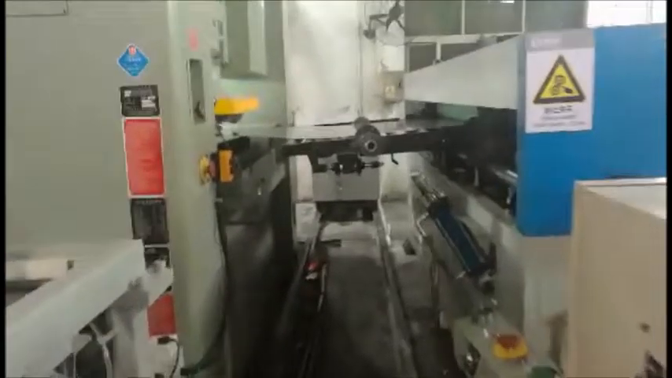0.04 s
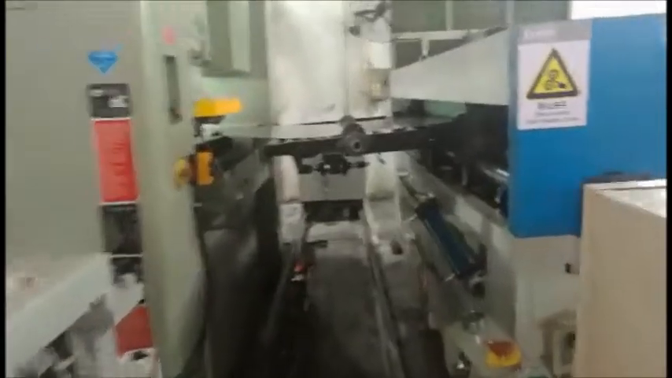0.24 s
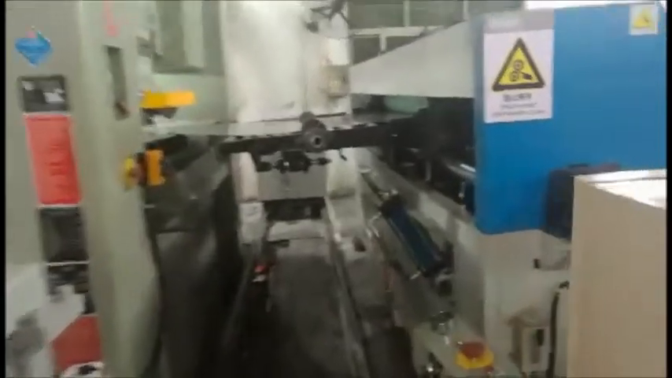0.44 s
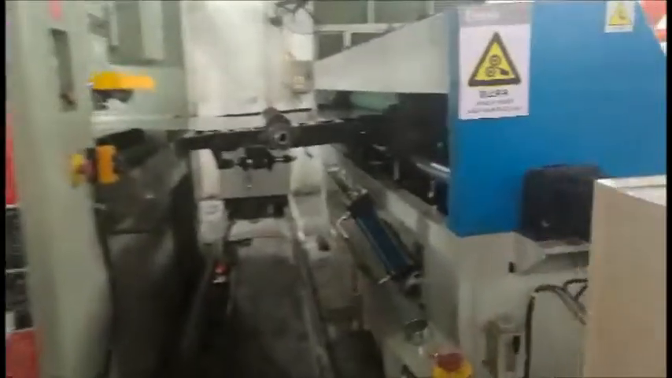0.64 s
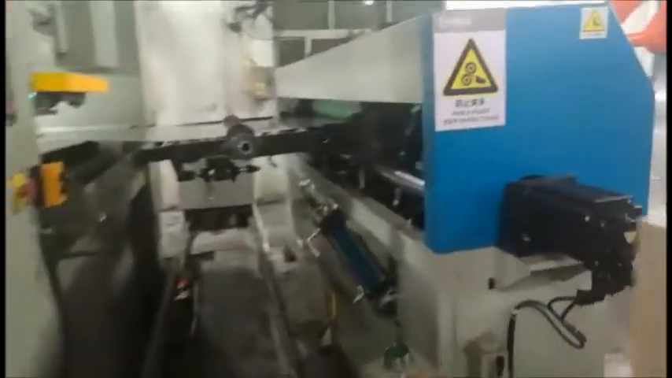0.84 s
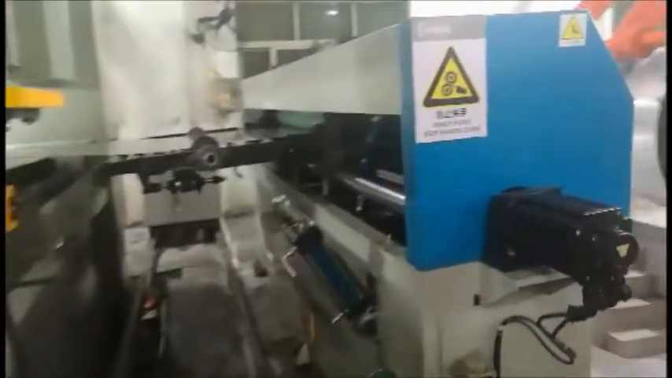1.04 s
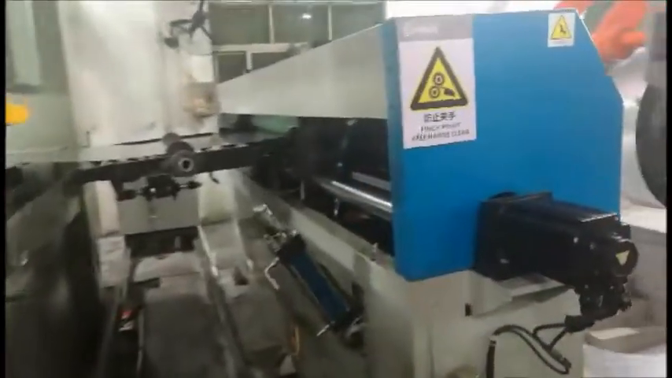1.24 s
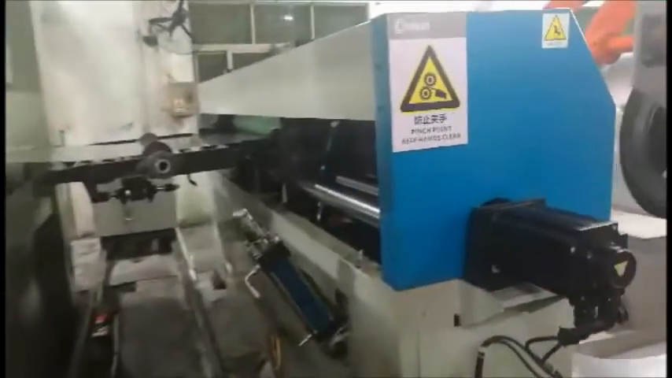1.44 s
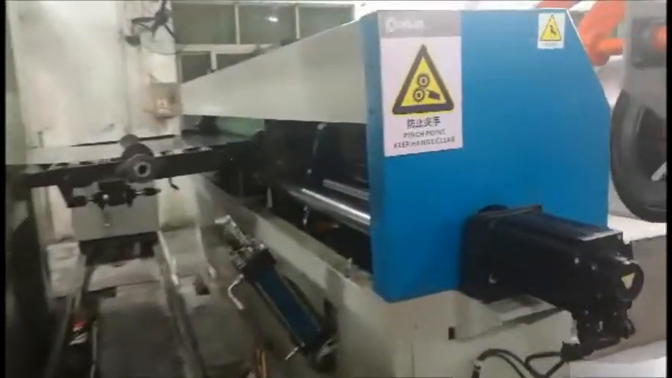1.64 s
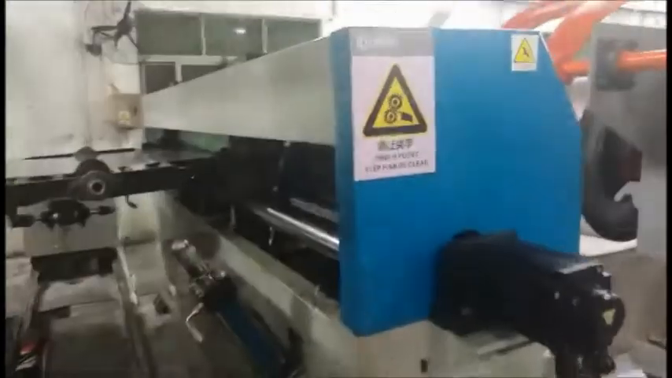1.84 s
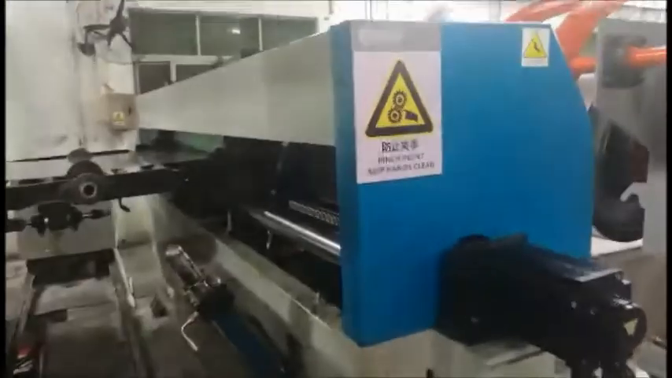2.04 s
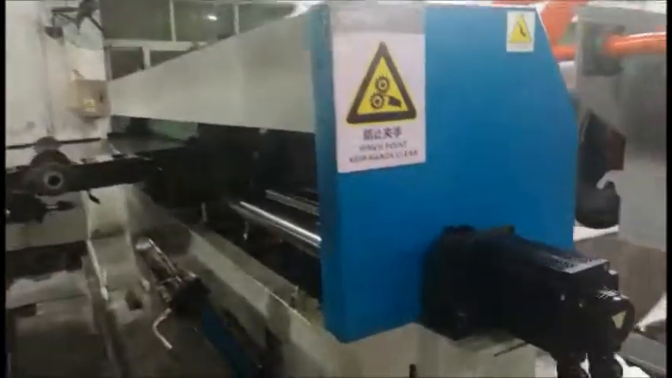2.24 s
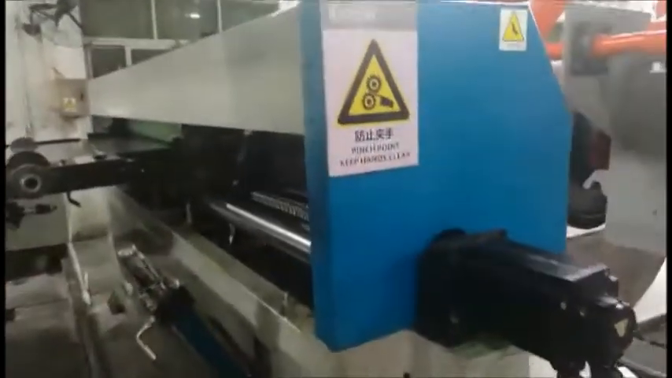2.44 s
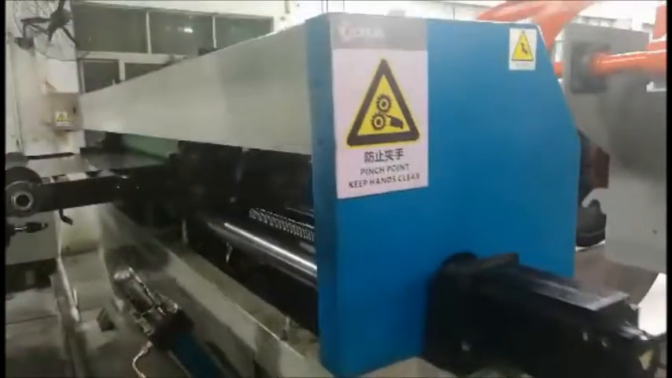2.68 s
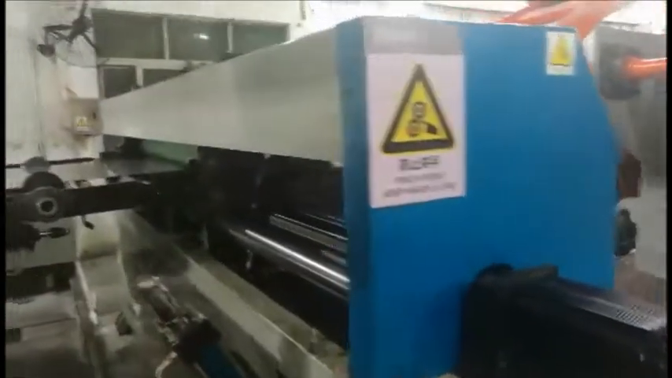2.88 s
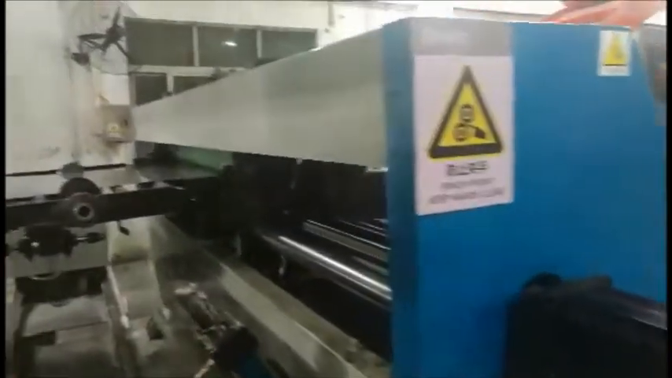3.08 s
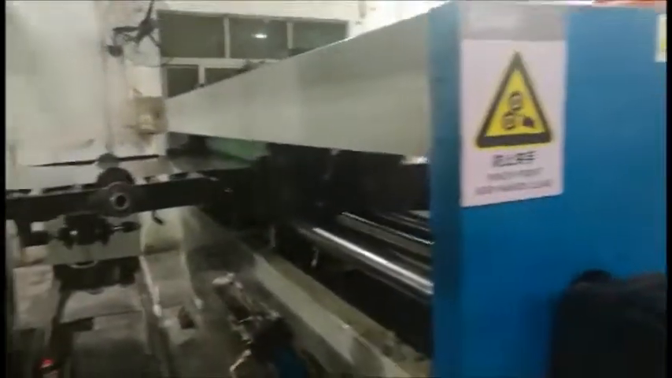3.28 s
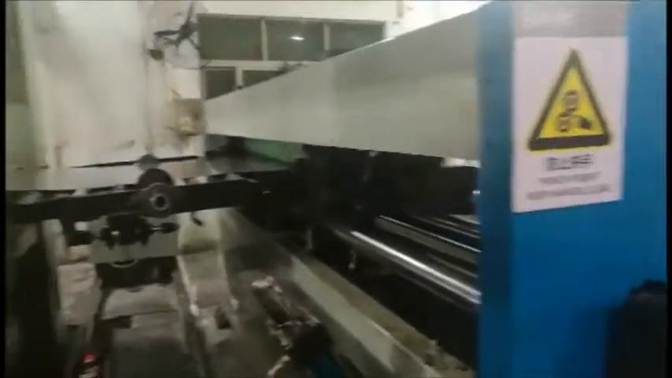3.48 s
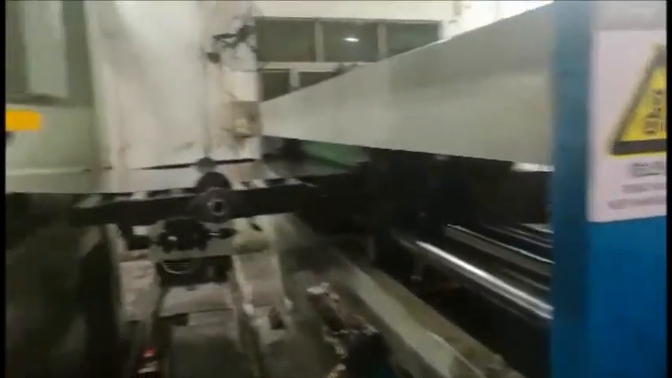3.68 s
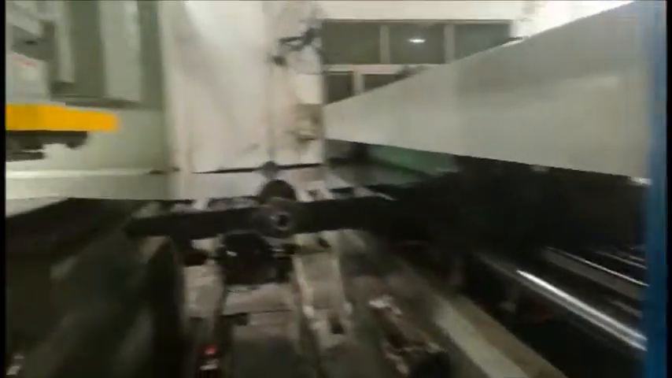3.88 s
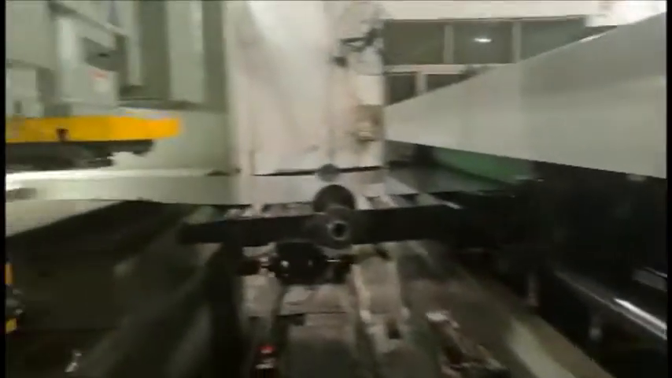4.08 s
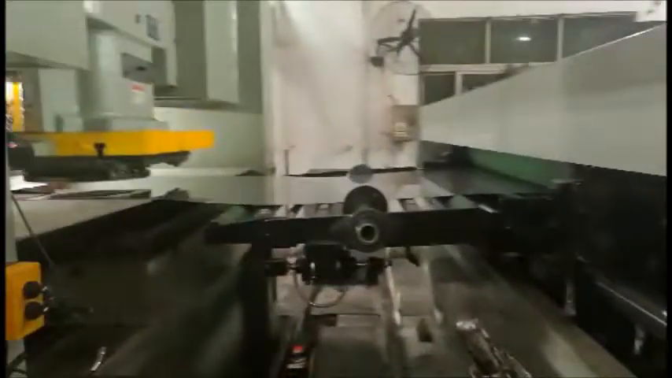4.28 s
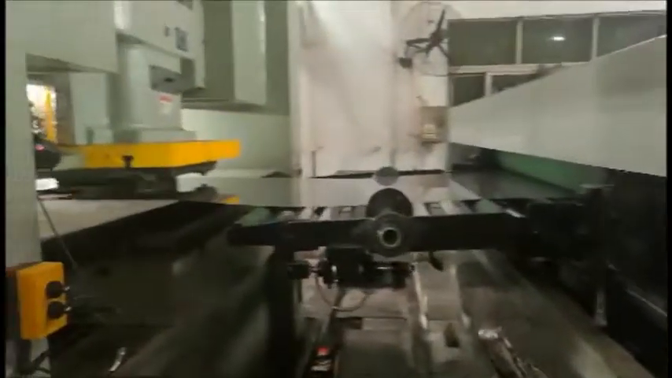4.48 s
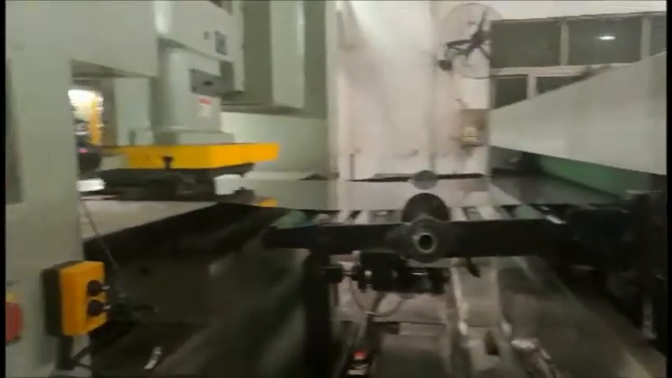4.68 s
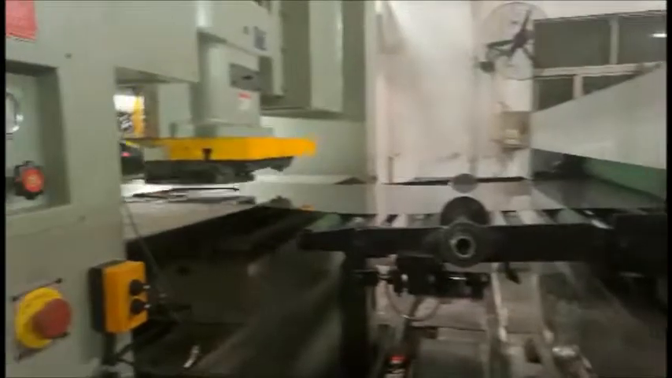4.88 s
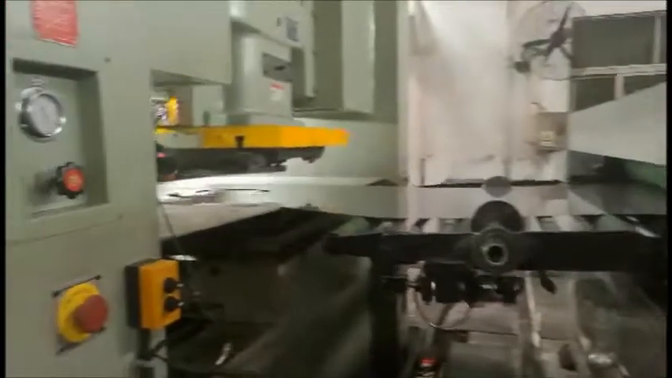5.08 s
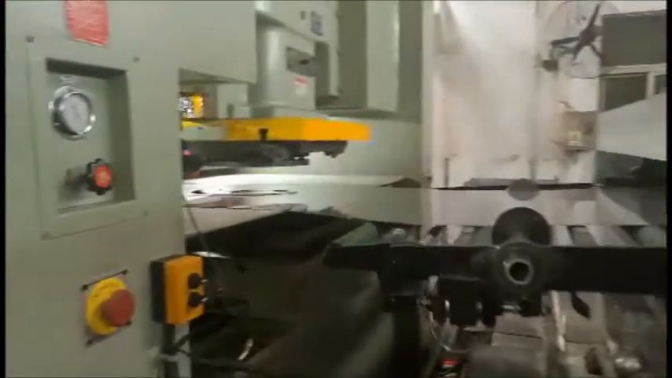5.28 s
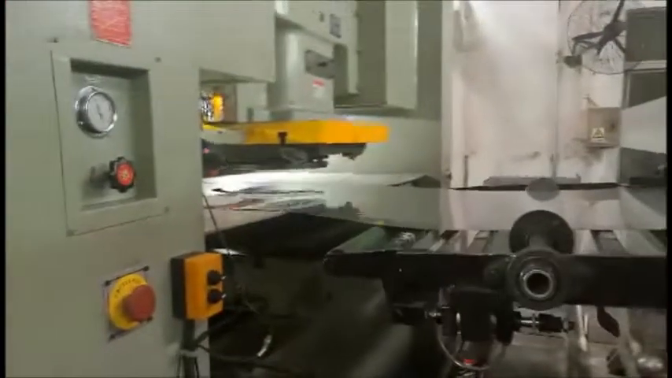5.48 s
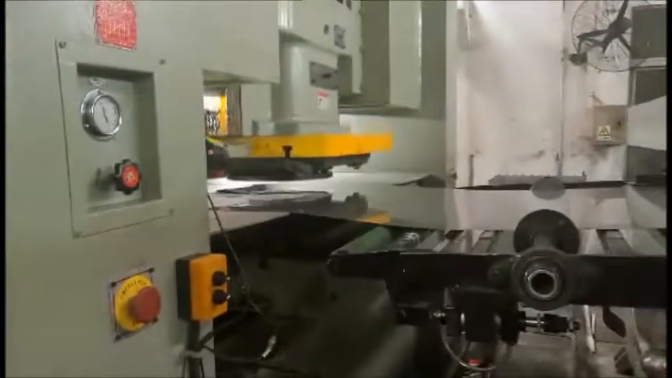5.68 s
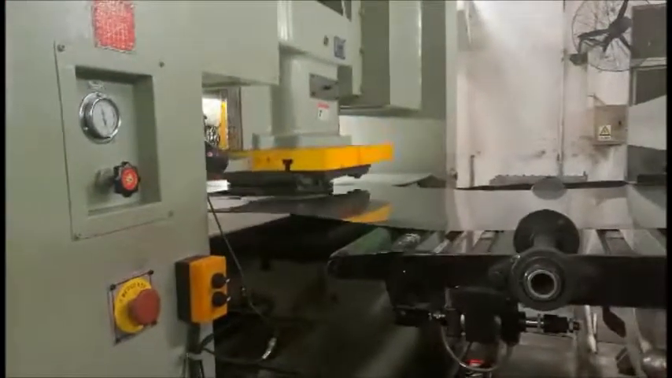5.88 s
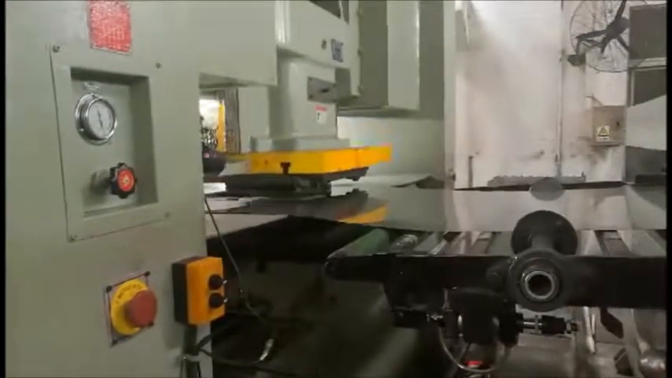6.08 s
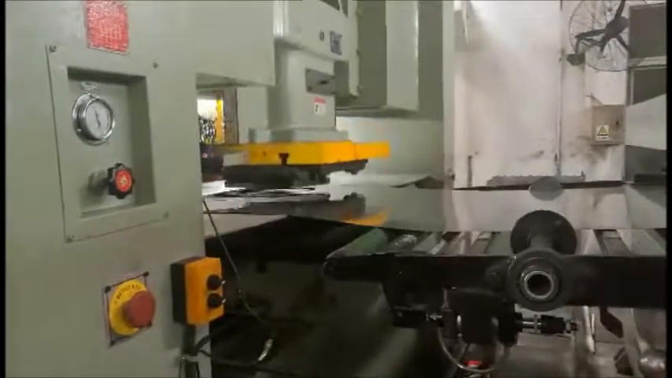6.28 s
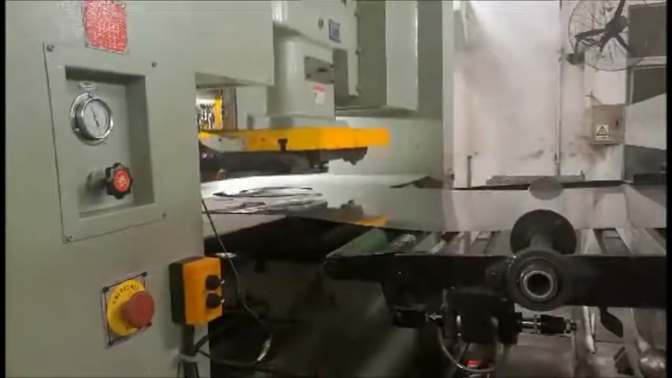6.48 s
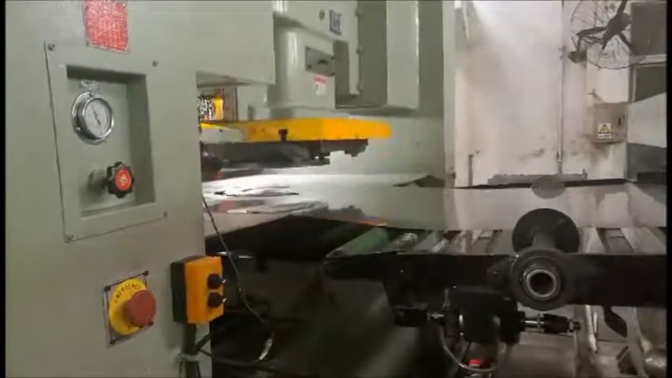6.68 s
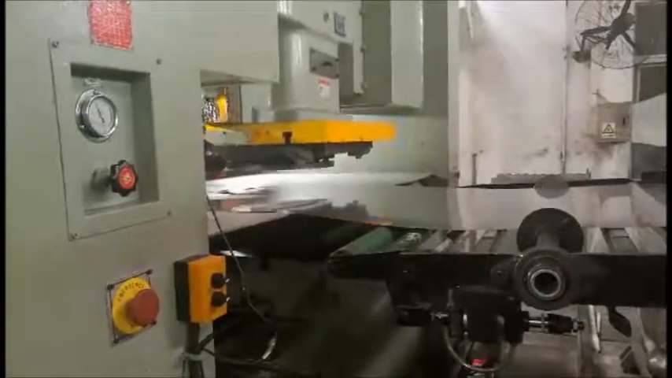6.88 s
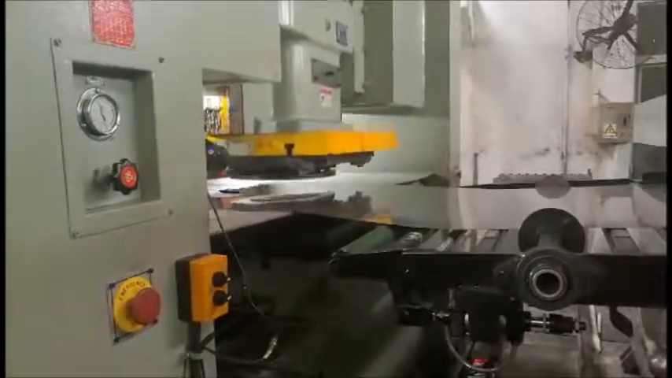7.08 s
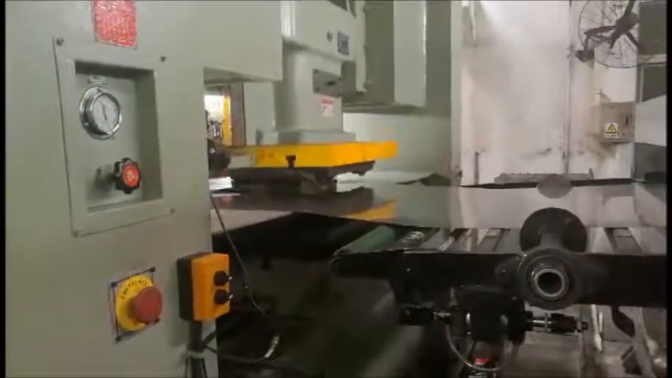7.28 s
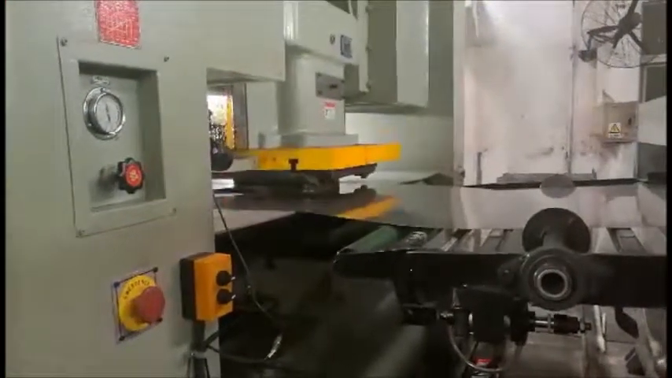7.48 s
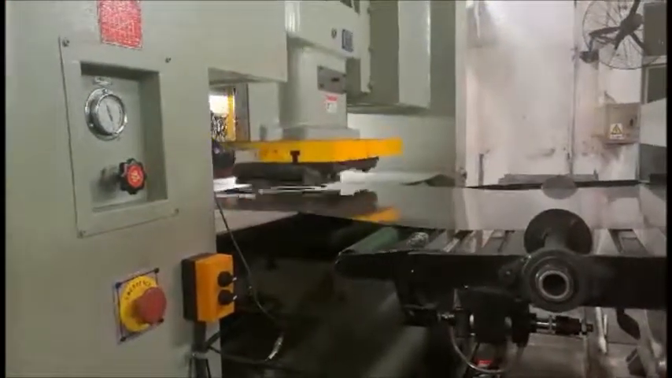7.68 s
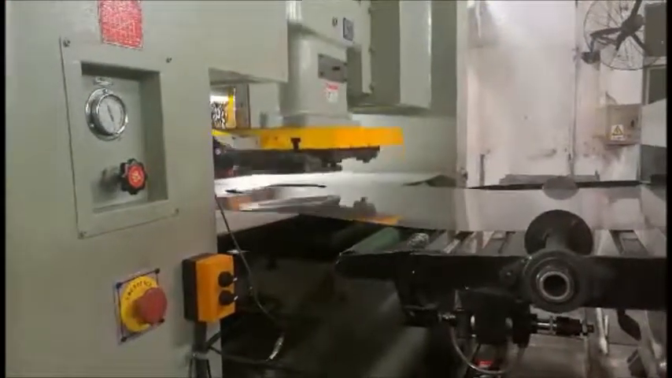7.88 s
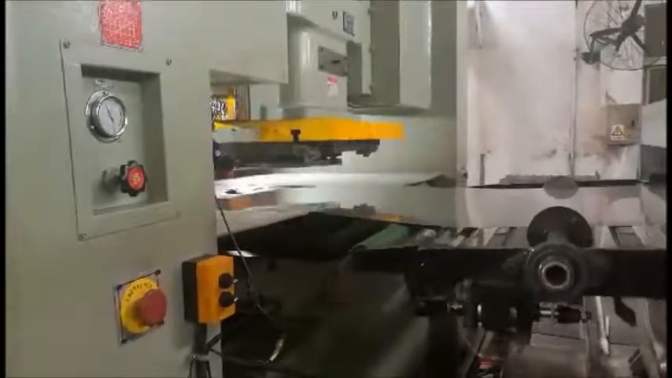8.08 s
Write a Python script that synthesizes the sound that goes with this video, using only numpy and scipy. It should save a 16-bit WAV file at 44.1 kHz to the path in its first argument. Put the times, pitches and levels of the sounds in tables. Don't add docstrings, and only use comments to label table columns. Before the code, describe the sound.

Six heavy metallic bangs ring through a humming factory, separated by sharp air spits, soft pneumatic sighs, dull distant thumps and tiny feeder ticks.

```python
import sys
import numpy as np
from scipy import signal
from scipy.fft import rfft, irfft, next_fast_len
from scipy.io import wavfile
from scipy.ndimage import uniform_filter1d

SR = 44100
rng = np.random.default_rng(int(sys.argv[2]) if len(sys.argv) > 2 else 0)


def dump(signal):
    limited = np.clip(np.atleast_2d(signal).T, -1, 1)
    pcm = np.round(limited * 32767).astype(np.int16)
    wavfile.write(sys.argv[1], SR, pcm)


def ratio_of_db(decibels):
    return 10 ** (np.asarray(decibels, float) / 20)


N = 358533


def evened(x):
    return x / np.sqrt(np.mean(x ** 2) + 1e-20)


def read(points, hz):
    f, value = np.transpose(points)
    return np.interp(np.log(hz + 1), np.log(f + 1), value)


def add(mix, s, sound, pan_db=0):
    part = mix[:, max(round(s * SR), 0):][:, :sound.shape[1]]
    sides = ratio_of_db(np.array([[pan_db / 2], [-pan_db / 2]]))
    part += sound[:, :part.shape[1]] * sides


def patches(hz, t, db):
    field = rng.standard_normal((len(hz), len(t)))
    across_pitch = uniform_filter1d(field, 7, 0)
    return ratio_of_db(db * evened(uniform_filter1d(across_pitch, 12, 1)))


def diffuse(seconds, gain, size):
    # pitch_hz, likeness (1 same, 0 unrelated, -1 opposite)
    likeness = [(60, 0.89), (130, 1), (290, 0.83), (640, -0.29), (1410, 0.19), (3100, -0.11), (6820, 0.06),
                (15000, -0.014)]
    hop = size // 4
    hz = np.fft.rfftfreq(size, 1 / SR)[:, None]
    t = np.arange(round(seconds * SR) // hop + 2) * hop / SR
    a, b, c, d = rng.standard_normal((len(t), len(hz), 4)).T
    same = np.clip(read(likeness, hz), -1, 1)
    left = a + 1j * b
    right = same * left + np.sqrt(1 - same ** 2) * (c + 1j * d)
    spectra = np.array([left, right]) * gain(hz, t)
    return signal.istft(spectra, nperseg=size, noverlap=size - hop)[1]


def hum():
    # pitch_hz, level_db (per Hz)
    background = [(12, -47), (20, -14), (148, -7.5), (196, -6.5), (289, 0.5), (477, -10.5), (685, -5.5),
                  (787, -4.5), (1010, -12), (1720, -11), (4940, -18), (7500, -25), (12000, -23),
                  (14200, -25), (15500, -78)]

    def spectra(hz, t):
        return ratio_of_db(read(background, hz)) * patches(hz, t, db=1.56)
    return ratio_of_db(-38.5) * evened(diffuse(N / SR + .1, spectra, size=1024)[:, :N])


def coloured(x, points, tilt_db=0, pivot_hz=1000, modes=()):
    hz = abs(np.fft.fftfreq(2 ** 14, 1 / SR))
    peaks = 1 + sum(ratio_of_db(db) ** 2 / (1 + (2 * (hz - f) / w) ** 2) for f, w, db in modes)
    level_db = read(points, hz) + tilt_db * np.log2((hz + 30) / pivot_hz)
    log_gain = np.log(ratio_of_db(level_db) * np.sqrt(peaks))
    body = np.fft.ifft(np.exp(np.conj(signal.hilbert(log_gain)))).real
    return signal.fftconvolve(x, body[None] / np.linalg.norm(body), axes=1)


def hall(force, near_db, far_db, seconds):
    # pitch_hz, t60_s (time to fade by 60 dB)
    near_fade = [(50, 0.17), (200, 0.75), (800, 0.39), (3000, 0.4), (9000, 0.59), (15000, 0.23)]
    far_fade = [(50, 2.3), (200, 2.33), (800, 3.21), (3000, 1.9), (9000, 1.46), (15000, 1.4)]
    # pitch_hz, level_db
    near_share = [(50, 2), (300, -0.5), (1000, 1.5), (3000, -4.5), (15000, 1)]
    # pitch_hz, level_db
    far_share = [(50, -6.5), (300, 2.5), (1500, -4.5), (6000, -6), (15000, -5)]

    def held(hz, t):
        smooth_power = uniform_filter1d(force ** 2, 128)
        power = np.interp(t, np.arange(len(force)) / SR, smooth_power, right=0)
        near_t60, far_t60 = read(near_fade, hz), read(far_fade, hz)
        near = ratio_of_db(near_db + read(near_share, hz) - 60 * t / near_t60) ** 2 / near_t60
        far = ratio_of_db(far_db + read(far_share, hz) - 60 * t / far_t60) ** 2 / far_t60
        echoes = (near + far * np.tanh(t / 0.026)) * t[1] * 14
        energy = signal.fftconvolve(echoes, power[None], axes=1)[:, :len(t)]
        return np.sqrt(abs(energy)) * patches(hz, t, db=0.67)

    def uneven(hz, t):
        return patches(hz, t, db=1.67)

    out = diffuse(seconds, held, size=512)
    direct = diffuse(len(force) / SR, uneven, size=256)[:, :len(force)]
    direct[1] = .8 * direct[1] + .5 * np.roll(direct[0], rng.choice([-28, 22, 36]))
    out[:, :len(force)] += force * direct
    return out / direct.std()


def burst(db, hold, t60, rise):
    t = np.arange(SR // 2) / SR
    return ratio_of_db(db - 60 * np.maximum(t - hold, 0) / max(t60, .02)) * np.tanh(t / rise)


def far_machine():
    # start_s, level_db (peak), length_s, tilt_db (per octave)
    thumps = [
        (0.038, -22.5, 0.07, 0.5),
        (1.099, -35, 0.06, 5.5),
        (2.119, -24.5, 0.16, 0.5),
        (4.391, -18, 0.059, 1),
        (5.239, -37, 0.047, 4),
        (5.737, -45, 0.042, -5),
        (7.036, -37.5, 0.045, 5),
    ]
    # pitch_hz, level_db (per Hz)
    thump_colour = [(50, -20), (90, -2), (300, -7), (700, -5.5), (1050, -7), (1500, -13), (3000, -16.5),
                    (8000, -32), (15000, -37)]
    # pitch_hz, width_hz, level_db
    clunk = [(764, 80, 1.5), (1075, 110, 2.5)]
    out = np.zeros((2, N))
    for s, db, hold, tilt_db in thumps:
        force = burst(db - 8.5, hold, t60=0.14, rise=0.024)
        thump = hall(force, near_db=-7, far_db=0, seconds=1.1)
        add(out, s - .016, coloured(thump, thump_colour, tilt_db, modes=clunk))
    return out


def jet(db, hold, t60, colour, tilt_db, rise, near_db, far_db, slap_db, modes=()):
    force = burst(db - 7.5, hold, t60, rise)
    slap = ratio_of_db(slap_db) * np.roll(force, round(.058 * SR))
    air = hall(np.hypot(force, slap), near_db, far_db, seconds=0.99)
    return coloured(air, colour, tilt_db, pivot_hz=6000, modes=modes)


def quick_valves():
    # start_s, level_db (peak), pitch_hz (loudest whistle), tilt_db (per octave), left_over_right_db
    spits = [
        (0.1992, -18, 10300, 2.5, -1),
        (0.4591, -15, 4900, 3, -2),
        (1.921, -22, 4100, 4.5, 0),
        (2.152, -21.5, 13400, 3.5, 0.5),
        (3.0618, -26.5, 5530, 4, -2),
        (4.2882, -22, 13000, 4, 0.5),
        (4.565, -20.5, 13400, 4, 2.5),
        (5.914, -21.5, 11700, 4.5, 0),
        (7.325, -21.5, 13100, 4.8, 1),
    ]
    # pitch_hz, level_db (per Hz)
    spit_colour = [(880, -35), (1500, 0.5), (3350, 2.5), (4850, -4), (5280, 1), (6090, -3.5), (7930, -6),
                   (10500, -3.5), (13600, -7.5), (14400, -15.5)]
    # pitch_hz, width_hz, level_db
    nozzle = [(3500, 76, -4), (4430, 32, 9.5), (5300, 61, 6), (8700, 86, -7), (10300, 52, -14),
              (11700, 40, -10), (13200, 42, -8), (13500, 40, -8)]
    out = np.zeros((2, N))
    for s, db, whistle_hz, tilt_db, pan_db in spits:
        bodies = [(hz * rng.uniform(0.925, 1.04), 2.7 * width, d - .5) for hz, width, d in nozzle]
        bodies.append((whistle_hz, 1100, 2.5))
        spit = jet(db, 0.019, 0.22, spit_colour, tilt_db, rise=0.0032,
                   near_db=-10.0, far_db=-8.5, slap_db=-10.5, modes=bodies)
        add(out, s - .005, spit, pan_db)
    return out


def load_db(t):
    snap_s, shear_s, strip_s, rattle_s = .001, 0.011, 0.0267, 0.056
    building = 1296 * np.maximum(snap_s - t, 0)
    slackening = 900 * np.maximum(t - shear_s, 0)
    shear = -2.5 - building - slackening
    strip = -2 - 1500 * abs(t - strip_s)
    settling = -12 - 720 * np.maximum(t - rattle_s, 0)
    rattle = np.maximum(settling, -20 - 200 * t)
    return np.maximum(np.maximum(shear, strip), np.where(t > snap_s, rattle, -np.inf))


def frame_ring(seconds, db, low_db, upper_db):
    # pitch_hz, level_db, t60_s (fade by 60 dB), rise_s (build-up)
    tones = [(57.5, -7.5, 0.37, 0.04), (136.4, -5, 0.32, 0.015), (151.8, -12.5, 2.46, 0.22),
             (170.5, -2.5, 0.36, 0.012), (179.3, -12, 2.02, 0.15), (251, -18, 2.66, 0.15),
             (316, -5, 0.34, 0.035), (313.3, -2.5, 1.04, 0.035), (359.3, -5, 0.54, 0.013),
             (392, -9.5, 0.94, 0.037), (505.4, -10, 0.76, 0.07), (608, -2.5, 0.24, .03)]
    u = np.maximum(seconds - .014, 0)
    out = np.zeros((2, len(u)))
    for (hz, d, t60, rise), (wander, turn, lean) in zip(tones, rng.standard_normal((len(tones), 3))):
        ring_db = low_db if hz < 280 else upper_db
        start_db = db + ring_db - 12.0 + d + 0.98 * wander
        size = ratio_of_db(start_db - 60 * u / t60) * (1 - np.exp(-u / rise))
        size = size * (1 + 0.3 * np.sin(2 * np.pi * 3.56 * lean * u + 3 * wander))
        phase = turn * np.pi + np.array([[0], [lean * hz / 700]])
        out += size * np.sin(2 * np.pi * hz * u + phase)
    return out


def above(x, hz):
    return x - signal.lfilter(*signal.butter(3, hz / (SR / 2)), x)


def stroke(db, low_db, tilt_db, upper_db, far_db):
    # pitch_hz, level_db (per Hz)
    crack = [(20, -61), (40, -17), (120, -10.5), (350, -10), (450, -12.5), (900, -10.5), (1500, -13.5),
             (2200, -16.5), (4000, -21.5), (7000, -30.5), (12000, -30), (15000, -39.5)]
    # pitch_hz, width_hz, level_db (over the crack)
    frame = [(58, 17, 8), (143.7, 7.2, 0), (179.2, 13.3, 10), (248, 24, 6), (314.8, 6.2, 11),
             (356.4, 5.2, 10.5), (406, 15, -0.5), (488, 17, 0), (599, 34, 2), (821, 54, 3), (957, 16, 5.5),
             (1106, 35, 2.5), (1276, 49, 0.5), (1510, 54, -2), (2024, 30, 1.5), (4700, 29, 7.5)]
    t = np.arange(SR // 4) / SR - .02
    force = ratio_of_db(db + load_db(t))
    jerks = np.repeat(rng.exponential(1, len(t) // 40 + 1), 40)[:len(t)]
    force = force * ratio_of_db(2.1 * (jerks - 1.5))
    bang = ratio_of_db(-6) * hall(force, -0.53, far_db, seconds=2.2)
    out = coloured(bang, crack, tilt_db, modes=frame)
    seconds = np.arange(out.shape[1]) / SR
    out -= np.clip((.0165 - seconds) / 0.0055, 0, 1) * above(out, 1600)
    out -= np.clip((.029 - seconds) / 0.014, 0, .6) * above(out, 5800)
    return out + frame_ring(seconds, db, low_db, upper_db)


def press():
    # start_s, level_db (peak), low_ring_db, upper_ring_db
    strokes = [
        (0.288, -8.5, 2.5, 4.5),
        (1.739, -3.5, 3, -1),
        (3.196, -4.5, 2.5, -0.5),
        (4.642, -3.5, -1.5, 0),
        (6.096, -2, 0.5, -1.5),
        (7.549, -3, 2.5, -1),
    ]
    out = np.zeros((2, N))
    for s, db, low_db, upper_db in strokes:
        louder_db = db + 4
        tilt_db = 0.67 + 0.0453 * louder_db
        far_db = 0.67 - 0.72 * louder_db
        add(out, s - .02, stroke(db, low_db, tilt_db, upper_db, far_db), pan_db=0.05)
    return out


def slow_vents():
    # start_s, level_db (peak), open_s, tilt_db (per octave), left_over_right_db
    sighs = [(.975, -30, 0.076, 0.5, 1), (1.04, -25, 0.045, 1, 2), (2.29, -28, 0.069, -3, 0.5),
             (3.34, -27, 0.064, 4, -2), (3.78, -23, 0.055, .5, 1), (3.825, -20.5, 0.047, 2.5, 0.5),
             (5.17, -25.5, 0.097, 0.5, 1.5), (5.36, -30, 0.053, 1.5, 2), (5.489, -42, 0.11, 6, 3),
             (6.635, -24.5, 0.05, -2, 3), (6.9, -38.5, 0.11, 5, .5), (7.95, -54, 0.052, -2, -1)]
    # pitch_hz, level_db (per Hz)
    air_colour = [(470, -32), (800, -6), (1160, -0.5), (1380, -6), (1930, 0.5), (2950, -3.5), (5150, -2.5),
                  (6400, -10.5), (12300, -11.5), (14400, -18.5)]
    out = np.zeros((2, N))
    for s, db, hold, tilt_db, pan_db in sighs:
        t60 = 0.18 - 0.07 * max(db + 29.5, 0)
        vent = jet(db, hold, t60, air_colour, tilt_db, rise=0.025, near_db=-7, far_db=-2.0, slap_db=-15)
        add(out, s - .005, vent, pan_db)
    return out


def feeder_ticks():
    # start_s, level_db (peak), pitch_hz
    ticks = [(1.268, -38, 3000), (1.322, -32, 3050), (1.42, -42, 2980), (1.47, -34, 2600),
             (1.484, -32, 2950), (1.5, -36, 3300), (1.527, -34, 2700), (1.571, -39, 2800),
             (1.676, -30.5, 2750), (3.545, -42, 14200), (4.566, -19, 13800), (7.29, -47, 13500),
             (7.38, -38, 4000), (7.445, -48, 11000)]
    out = np.zeros((2, N))
    t = np.arange(SR // 20) / SR
    for s, db, hz in ticks:
        tones = np.zeros((2, len(t)))
        for tone_hz in (hz - 330, hz, hz + 330):
            tones += np.sin(2 * np.pi * (tone_hz * t + rng.random((2, 1))))
        add(out, s, ratio_of_db(db - 2.5 - 60 * t / 0.023) * tones)
    return out


def scene():
    return hum() + far_machine() + quick_valves() + press() + slow_vents() + feeder_ticks()


def roll_off(x):
    return signal.sosfilt(signal.butter(12, 15610, fs=SR, output="sos"), x)


def record(dry):
    # pitch_hz, left_over_right_db
    shading = [(60, 1), (130, 0.0), (290, 0.5), (640, -0.5), (1410, 2.5), (3100, 1.0), (6820, 1.5),
               (15000, -1.5)]
    size = next_fast_len(N)
    lean = ratio_of_db(read(shading, np.fft.rfftfreq(size, 1 / SR)) / 2)
    shaded = irfft(rfft(dry, size) * np.array([lean, 1 / lean]), size)[:, :N]
    mid = shaded.mean(0)
    side = (shaded[0] - shaded[1]) / 2
    side = signal.lfilter(*signal.butter(2, 110 / (SR / 2), "high"), side)
    ceiling = .98
    limited = ceiling * np.tanh(np.array([mid + side, mid - side]) / ceiling)
    band_edge = signal.firwin(401, 14430, window="blackman", fs=SR)
    return roll_off(signal.oaconvolve(limited, band_edge[None], "same"))


dry = scene()
out = record(dry)
dump(out)
```